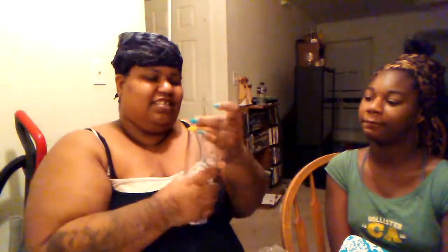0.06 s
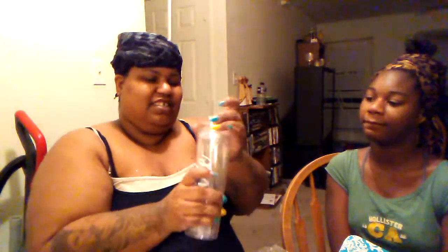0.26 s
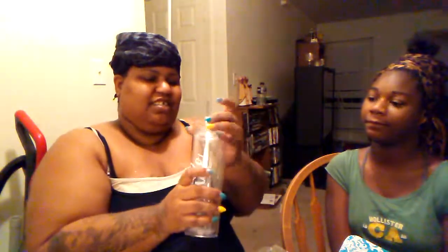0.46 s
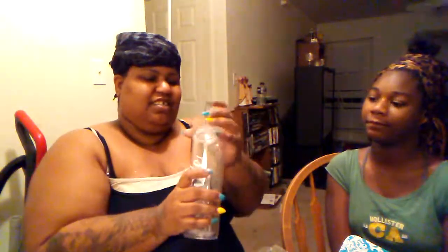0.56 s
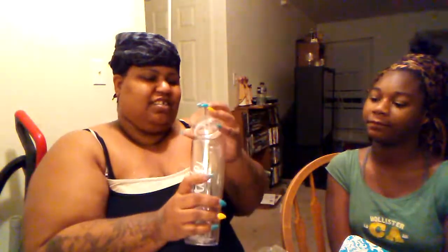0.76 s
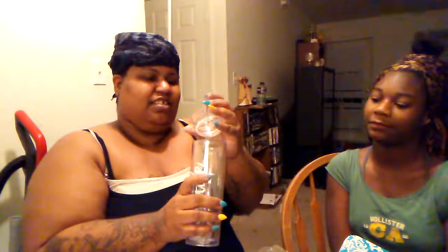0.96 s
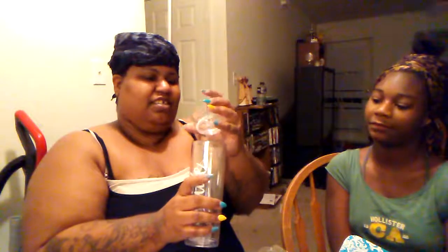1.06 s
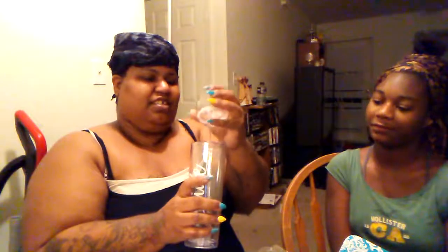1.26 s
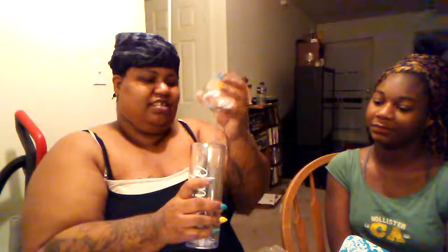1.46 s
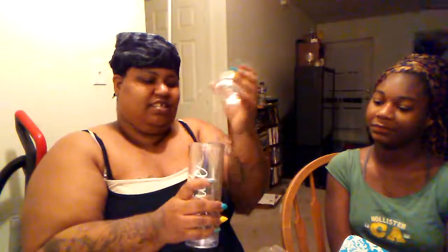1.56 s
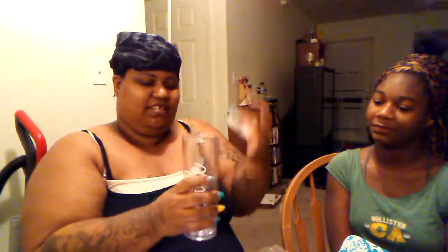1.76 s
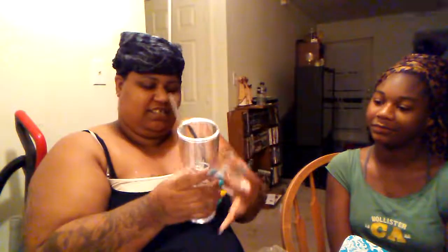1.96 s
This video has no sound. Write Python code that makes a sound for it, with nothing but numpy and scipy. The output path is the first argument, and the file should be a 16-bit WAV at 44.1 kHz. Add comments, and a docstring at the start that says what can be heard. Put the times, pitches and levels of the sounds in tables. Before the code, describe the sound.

A hard plastic tumbler clatters as lid and straw knock against it, with faint rubbing at first; a pause, one knock, a louder flurry, then sparser taps. Furnished room, fairly close microphone, low hum and hiss.

```python
"""A flurry of hard plastic knocks opens the scene: a tumbler, its lid and straw bounce in a furnished room.
Under it lid and straw rub in tiny ticks until 0.45 s, and a palm bumps the tumbler softly at 0.24 s.
A lone knock follows at 0.82 s, a second flurry with the loudest hit from 1.04 s, then sparser knocks.
Each knock is a noise crack, decaying wall modes and a split cup note, answered by a noise-built room tail.
Throughout, shaped noise and wavering sines make a far appliance's rumble and hum, with a hiss that dips."""
import sys
import numpy as np
from scipy import signal
from scipy.fft import rfft, irfft, next_fast_len
from scipy.io import wavfile
from scipy.ndimage import map_coordinates

SR = 44100
rng = np.random.default_rng(int(sys.argv[2]) if len(sys.argv) > 2 else 0)


def wav_record(signal):
    """Record a signal, one row per channel, as 16-bit PCM in the file named by sys.argv[1]."""
    frames = np.transpose(np.atleast_2d(signal))
    bounded = np.clip(frames, -1, 1)
    # unit amplitude maps onto the largest positive 16-bit level
    quanta = np.round(bounded * 32767).astype(np.int16)
    wavfile.write(sys.argv[1], SR, quanta)


N = 88200  # two seconds

# Contacts: (time [s], overall level [dB], cup note [Hz], favoured wall pitch [Hz],
# then relative levels of thud, low knock, cup note, upper knock, middle and treble, all [dB])
CONTACTS = [(0.001, -32.5, 1906, 3770, -30, -11.5, -18, -8, -4.5, -16.5),
            (0.1512, -27, 1810, 2650, -1, -3.5, -17, -30, -13, -15.5),
            (0.158, -29, 1920, 3790, -32.5, -8.5, -9.5, -21, -20, -32),
            (0.2272, -14.5, 2215, 8306, -38, -30, -20.5, -33, -9.5, -9.5),
            (0.2424, -13, 1900, 4426, -16, -10.5, -17.5, -16, -16.5, -17),
            (0.2732, -10.5, 2020, 5382, -13, -45, -18, -18, -11.5, -17),
            (0.3059, -3, 1876, 3666, -19, -27, -7.5, -20.5, -21.5, -20.5),
            (0.317, -17, 1852, 3945, -27, -5, 1, -5, -7, -21),
            (0.3232, -8, 1857, 3724, -29, -20.5, -12, -26, -17, -23),
            (0.3441, -18, 1680, 3520, -1, -44, -15, -19, -32, -20),
            (0.3781, -16.5, 1880, 4510, -18.5, -39, -8, -14, -12, -21.5),
            (0.3995, -20, 1830, 3715, -19, -55, -35, -23, -13, -16.5),
            (0.824, -15, 1770, 3030, -49, -17, -30, -15, -13.5, -18.5),
            (1.039, -10, 1896, 8910, -46, -27.5, -17, -20, -21, -14),
            (1.06, 0.5, 1867, 3740, -54, -23.5, -8, -27, -18.5, -24),
            (1.1149, -4.5, 1856, 3870, -38, -27.5, -10, -23, -22.5, -27.5),
            (1.1507, -8, 1854, 3940, -44, -20.5, -16, -28, -22, -31),
            (1.1752, -10, 1879, 3920, -56, -24.5, -11, -31.5, -17.5, -27),
            (1.1941, -21.5, 1866, 3950, -58, -12, -3.5, -28, -17, -17.5),
            (1.2095, -23, 1826, 3600, -33, -19, -4.5, -20.5, -14, -20.5),
            (1.2235, -22.5, 1813, 3706, -23, -17, -17, -12, -10, -44),
            (1.247, -27.5, 1870, 3800, -39, -13.5, -8, -20, -19, -26),
            (1.5056, -5.5, 1867, 7680, -29.5, -21.5, -25, -13, -14, -14),
            (1.6031, -8.5, 2097, 3366, -29, -22, -8.5, -20.5, -14.5, -12.5),
            (1.6825, -16, 1875, 5005, -26, -10.5, -12, -12.5, -11, -9),
            (1.725, -20.5, 2170, 9160, -26, -6.5, -9, -11, -11.5, -10),
            (1.751, -27.5, 1875, 3500, -40, -13.5, -7.5, -14, -9, -18),
            (1.777, -26.5, 1883, 3660, -47, -39, -6, -17, -17, -16.5),
            (1.9552, -37, 1932, 4700, -45, -10.5, -7.5, -19, -12.5, -26),
            (1.9745, -24.5, 1910, 4240, -42, -9.5, -14, -15.5, -10, -17.5)]
# Centres of the bands that colour a contact, from thud to highest treble: (frequency [Hz])
BAND_HZ = [400, 1000, 1400, 2000, 2850, 4200, 8500, 14000]
# The plastic's own colour on the crack: (frequency [Hz], gain [dB])
PLASTIC_COLOUR = [(150, -26), (270, 1.5), (680, -17), (960, -0.5), (1250, -0.5), (1600, 2), (2000, 9),
                  (2600, 0), (3800, 4.5), (5400, -0.5), (7000, 0.5), (9300, 4), (10500, 0)]
# Ringing modes of the thin walls: (nominal frequency [Hz], relative level [dB], decay by 60 dB [s])
WALL_MODES = [(955.4, -0.5, 0.04), (2848, 1, 0.027), (3630, -5, 0.085), (4066, 2, 0.024), (4437, 3, 0.027),
              (5060, -6, 0.029), (5835, -5, 0.044), (6253, 0.5, 0.035), (8400, 2.5, 0.0083),
              (9270, 0, 0.034)]
# Lower modes that sound with the tumbler's note: (frequency [Hz], relative level [dB], decay by 60 dB [s])
LOWER_CUP_MODES = [(470, -29.5, .15), (1283, -16.5, 0.072), (1583, -14, 0.078)]
# Swells of the rubbing: (time [s], relative level [dB])
RUB_LEVEL = [(0, -46.5), (.08, -61), (.1, -40.5), (.14, -45), (.17, -41), (.22, -42), (.25, -33.5),
             (.34, -37.5), (.4, -44.5), (.45, -78.5)]
# Spectrum of the rubbing: (frequency [Hz], relative level [dB])
RUB_SPECTRUM = [(180, -36.5), (300, -13.5), (650, -13.5), (960, -11), (1300, -12.5), (1850, -10),
                (2250, -12.5), (2700, -4.5), (3250, -23.5), (3650, -9), (4300, -12.5), (8500, -23),
                (16000, -40)]
# How fast the room's tail dies: (frequency [Hz], decay by 60 dB [s])
ROOM_DECAY = [(300, 0.14), (1000, 0.4), (1900, 0.45), (4000, .4), (8000, 0.32), (15000, 0.16)]
# Swells shared by rumble and hum: (time [s], level [dB])
LOW_LEVEL = [(0.0, -51.5), (0.46, -51.5), (0.53, -49), (0.61, -58), (1.26, -56.5), (1.31, -51.5),
             (1.41, -53), (1.47, -52), (1.73, -57.5), (2.0, -50.5)]
# Spectrum of the rumble: (frequency [Hz], relative level [dB])
RUMBLE_SPECTRUM = [(30, -36.5), (45, 7), (58, 2), (85, -2), (120, -2), (180, -21.5), (250, -64.5)]
# Tones of the hum: (frequency [Hz], level over the swells [dB], waver depth [scale factor])
HUM_TONES = [(61.3, -1.5, 0.82), (119, -3, 0.34), (477, -14, 0.7)]
# Rise and dip of the hiss: (time [s], level [dB])
HISS_LEVEL = [(0, -54.5), (.6, -58.5), (.7, -59.5), (.72, -69), (.81, -64.5), (.84, -60.5), (1.45, -62),
              (2, -61)]
# Spectrum of the hiss: (frequency [Hz], relative level [dB])
HISS_SPECTRUM = [(88, -38), (150, -5.5), (398, -10), (520, -14.5), (1260, -19.5), (1980, -14),
                 (2810, -18.5), (8900, -17.5), (16000, -27.5)]

# _T60_S is the time to fall by 60 dB
CRACK_DB, CRACK_T60_S, CONTACT_RISE_S = 5, 0.062, 0.0011
TOP_UNDER_TREBLE_DB = -11.5
VALLEY_DB = 3.5  # the band between low knock and cup note, over the weaker of the two
CRACK_AT_CUP_DB = 5  # most that the crack rises near the cup note over its neighbours
WALLS_DB, WALL_SCATTER_DB, WALL_DETUNE = -2, 2, 0.01  # detune is a fraction of the pitch
FAVOUR_DB, FAVOUR_T60_S = 4.5, 0.039
CUP_DB, CUP_T60_S, CUP_RISE_S = -4.5, 0.071, 0.0011
CUP_TWIN_DB, CUP_TWIN_RATIO = -8.5, 1.045
CUP_DRY_DB = 3  # extra cup ring without the room
LINGER_DB, LINGER_T60_S = -17, 0.41
LINGER_HZ, LINGER_SPREAD_HZ = 1846, 32  # the tumbler's long wavering ring
LINGER_WIDTH = 0.013  # how near a cup note must be to wake that ring [log frequency ratio]
RUB_DB, RUB_TICKS_PER_S, RUB_SIZE_DB = -3.5, 170, 4
THUMP_S, THUMP_HZ, THUMP_DB, THUMP_T60_S, THUMP_RISE_S = 0.243, 133, -32, 0.17, 0.0091
RUMBLE_DB = -4.5
ROOM_DB, ROOM_RISE_S = -2.5, 0.0044
EARLY_DB, EARLY_T60_S = 7, 0.071  # near walls
TOP_HZ = 15750


def knocks():
    """Place every plastic contact in time, each with its own answer from the room."""
    out = np.zeros(N + 2 * SR)
    for time, level_db, cup_hz, favour_hz, *levels in CONTACTS:
        one = amp(level_db) * knock(cup_hz, favour_hz, levels)
        start = round(time * SR)
        out[start:start + len(one)] += one
    return out[:N]


def knock(cup_hz, favour_hz, levels):
    """One contact excites the plastic and its hollow; where it lands sets the balance of bands."""
    t = np.arange(SR // 2) / SR
    colour = contact_colour(levels)
    cup_db = levels[2]
    ring = amp(CUP_DB + cup_db) * cup_ring(t, cup_hz)
    out = room(crack(t, colour) + wall_ring(t, favour_hz, colour) + ring)
    out[:len(ring)] += amp(CUP_DRY_DB) * ring
    return out


def contact_colour(levels):
    """Turn a contact's six levels into an eight-band colour, holding back the crack's cup band."""
    thud, low, cup_db, upper, middle, treble = levels
    near_cup = min(cup_db, (low + upper) / 2 + CRACK_AT_CUP_DB)
    valley = min(low, near_cup) + VALLEY_DB
    top = treble + TOP_UNDER_TREBLE_DB
    return list(zip(BAND_HZ, [thud, low, valley, near_cup, upper, middle, treble, top]))


def crack(t, colour):
    """The impact itself: a short noise burst coloured by the contact and the plastic."""
    noise = rng.standard_normal(len(t))
    coloured = filtered(noise, lambda hz: amp(along(colour, hz) + along(PLASTIC_COLOUR, hz)))
    return amp(CRACK_DB) * coloured * dying(t, CRACK_T60_S, CONTACT_RISE_S)


def wall_ring(t, favour_hz, colour):
    """Thin walls ring as decaying sines, each a little off in pitch and level at every contact."""
    modes = WALL_MODES + [(favour_hz, FAVOUR_DB, FAVOUR_T60_S)]
    out = np.zeros(len(t))
    for hz, db, t60 in modes:
        level_draw, pitch_draw = rng.standard_normal(2)
        level = amp(WALLS_DB + db + along(colour, hz) + WALL_SCATTER_DB * level_draw)
        tone = np.sin(2 * np.pi * hz * (1 + WALL_DETUNE * pitch_draw) * t)
        out += level * dying(t, t60, CONTACT_RISE_S) * tone
    return out


def cup_ring(t, cup_hz):
    """The hollow cup sings a split note; near the tumbler's pitch, lower modes and a long ring join in."""
    note = np.sin(2 * np.pi * cup_hz * t)
    twin = amp(CUP_TWIN_DB) * np.sin(2 * np.pi * cup_hz * CUP_TWIN_RATIO * t)
    cup = (note + twin) * dying(t, CUP_T60_S, CUP_RISE_S)

    near = np.exp(-(np.log(cup_hz / LINGER_HZ) / LINGER_WIDTH) ** 2)
    # narrow-band noise wavers like close modes beating
    narrow = lambda hz: np.exp(-((hz - LINGER_HZ) / LINGER_SPREAD_HZ) ** 2)
    beating = unit(filtered(rng.standard_normal(len(t)), narrow))
    linger = amp(LINGER_DB) * beating * dying(t, LINGER_T60_S, CUP_RISE_S)

    lower = sum(amp(db) * np.sin(2 * np.pi * hz * t) * dying(t, t60, CUP_RISE_S)
                for hz, db, t60 in LOWER_CUP_MODES)
    return cup + near * (linger + lower)


def rubbing():
    """Lid and straw slide on the plastic in many tiny random ticks, each a short grain of noise."""
    t = np.arange(N) / SR
    struck = rng.random(N) < RUB_TICKS_PER_S / SR
    ticks = struck * amp(RUB_SIZE_DB * rng.standard_normal(N))
    grain_shape = amp(-60 * t[:800] / 0.14)  # cut off after 800 samples
    grains = signal.fftconvolve(ticks, grain_shape)[:N] * rng.standard_normal(N)
    grains = unit(filtered(grains, lambda hz: amp(along(RUB_SPECTRUM, hz))))
    level = amp(np.interp(t, *np.transpose(RUB_LEVEL), right=-120))
    return room(amp(RUB_DB) * level * grains)[:N]


def thump():
    """The palm meets the tumbler with one soft low bump, a decaying sine."""
    t = np.clip(np.arange(N) / SR - THUMP_S, 0, None)
    return amp(THUMP_DB) * dying(t, THUMP_T60_S, THUMP_RISE_S) * np.sin(2 * np.pi * THUMP_HZ * t)


def room(x):
    """Answer x with a fresh noise tail: each frequency dies at its own speed, and near walls add early strength."""
    hz, t, bins = signal.stft(rng.standard_normal(SR // 2), SR, nperseg=256)
    fading = amp(-60 * t / along(ROOM_DECAY, hz)[:, None])
    tail = signal.istft(bins * fading, SR, nperseg=256)[1]
    t = np.arange(len(tail)) / SR
    early = amp(EARLY_DB - 60 * t / EARLY_T60_S)
    tail = tail * (1 - np.exp(-t / ROOM_RISE_S)) * (1 + early)
    answer = signal.fftconvolve(x, tail / np.linalg.norm(tail))
    return np.pad(x, (0, len(tail) - 1)) + amp(ROOM_DB) * answer


def background():
    """The far appliance's swelling rumble and hum, under a hiss that dips briefly."""
    t = np.arange(N) / SR
    low_level = amp(np.interp(t, *np.transpose(LOW_LEVEL)))
    low = low_level * (amp(RUMBLE_DB) * shaped_noise(RUMBLE_SPECTRUM) + hum(t))
    hiss_level = amp(np.interp(t, *np.transpose(HISS_LEVEL)))
    return low + hiss_level * shaped_noise(HISS_SPECTRUM)


def hum(t):
    """Steady motor-like tones whose level and phase wander at random."""
    out = np.zeros(len(t))
    for hz, db, waver in HUM_TONES:
        level = amp(db + 2 * waver * wobble(8))
        phase = waver * wobble(2.7)
        out += level * np.sin(2 * np.pi * hz * t + phase)
    return out


def shaped_noise(spectrum):
    """Noise filtered to a spectrum and scaled to rms 1."""
    return unit(filtered(rng.standard_normal(N), lambda hz: amp(along(spectrum, hz))))


def dying(t, t60, rise):
    """Envelope with a soft onset and a decay of 60 dB in t60 seconds."""
    return amp(-60 * t / t60) * (1 - np.exp(-t / rise))


def wobble(rate):
    """A smooth random curve, rate knots a second."""
    knots = rng.standard_normal(int(N * rate / SR) + 4)
    return map_coordinates(knots, [np.arange(N) * rate / SR])


def filtered(x, response):
    """Shape the spectrum of x by a response of frequency."""
    m = next_fast_len(len(x) + 4096)
    return irfft(rfft(x, m) * response(np.fft.rfftfreq(m, 1 / SR)), m)[:len(x)]


def along(points, hz):
    """Read (frequency, value) points on a log frequency axis."""
    f, v = np.transpose(points)
    return np.interp(np.log(hz + 1), np.log(f + 1), v)


def unit(x):
    """Scale to rms 1."""
    return x / np.sqrt(np.mean(x ** 2) + 1e-20)


def amp(db):
    """Decibels to gain."""
    return 10 ** (np.asarray(db) / 20)


def scene():
    """All sources, one channel."""
    return (knocks() + rubbing() + thump() + background())[None]


def record(dry):
    """A very steep low-pass removes the treble above the band limit."""
    return filtered(dry[0], lambda hz: 1 / (1 + (hz / TOP_HZ) ** 150))[None]


dry = scene()
out = record(dry)
wav_record(out)
```